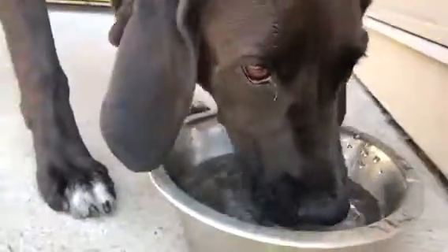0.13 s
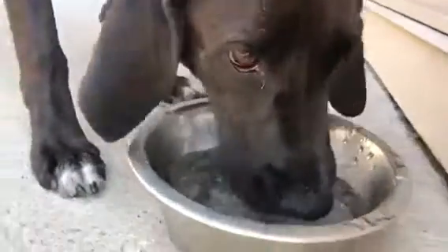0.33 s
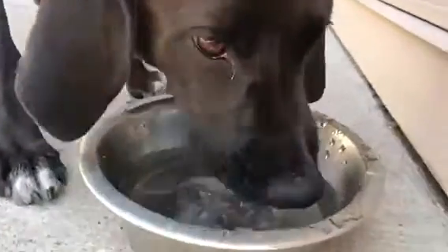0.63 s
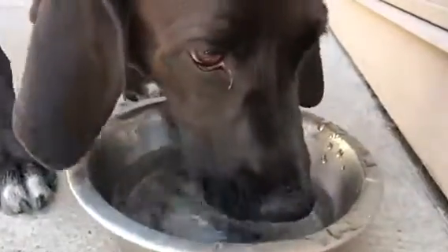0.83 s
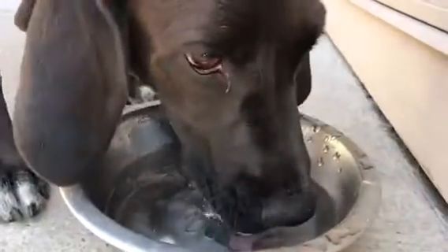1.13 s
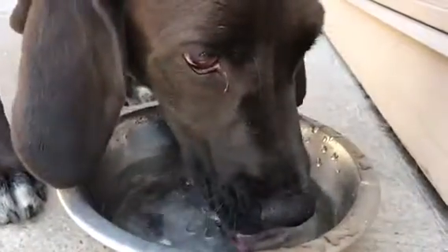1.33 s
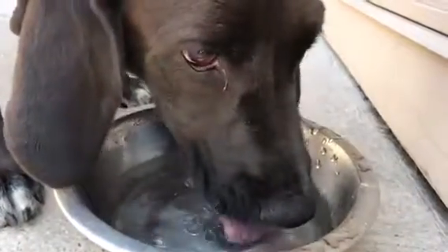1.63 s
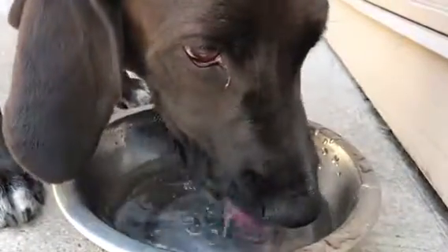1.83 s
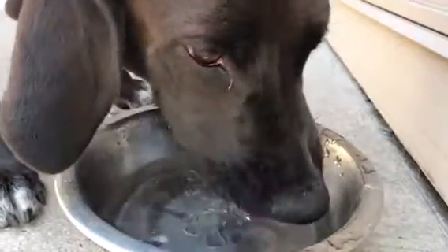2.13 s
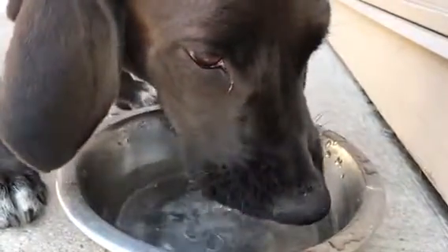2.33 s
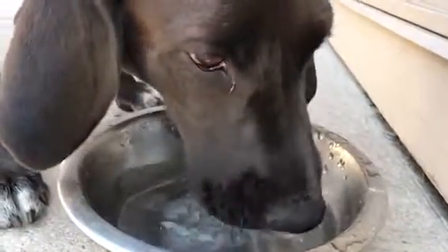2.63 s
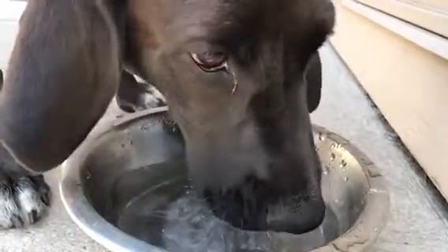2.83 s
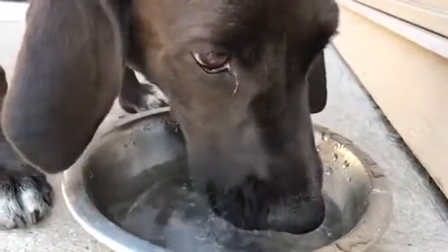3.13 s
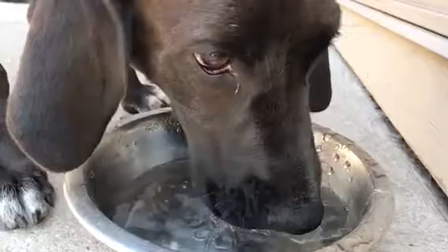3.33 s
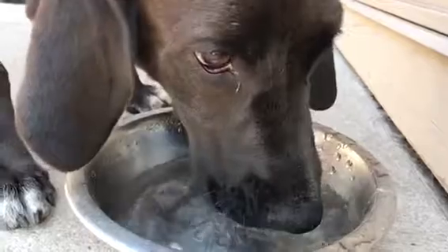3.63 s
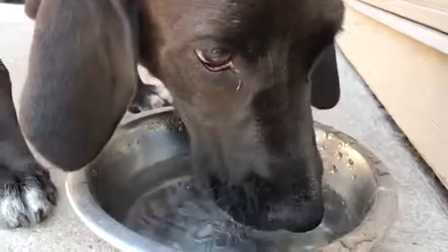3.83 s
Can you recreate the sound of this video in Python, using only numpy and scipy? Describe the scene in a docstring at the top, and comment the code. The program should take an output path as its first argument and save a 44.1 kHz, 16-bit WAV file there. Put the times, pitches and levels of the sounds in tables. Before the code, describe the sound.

Dog drinking from a steel bowl, crisp lapping first, then near silence and dull sloshing.

```python
"""Dog lapping from a steel bowl

A dog laps water close to the microphone, on a hard floor, over a faintly crackling hiss and a low rumble.
Tongue strokes are clouds of short chirps, trapped air bubbles are gliding sines, and the bowl rings along.
After the first second the hiss sinks, returning in swells, and the sound turns muffled: low gulps and sloshing."""
import sys
import numpy as np
from scipy import signal
from scipy.fft import rfft, irfft
from scipy.io import wavfile

SR = 44100
rng = np.random.default_rng(int(sys.argv[2]) if len(sys.argv) > 2 else 0)


def transcribe(signal):
    """Save signal, clipped to [-1, 1], as a 16-bit WAV file at the path in sys.argv[1]."""
    frames = np.atleast_2d(signal).T
    limited = np.clip(frames, -1, 1)
    pcm = np.round(limited * 32767).astype(np.int16)
    wavfile.write(sys.argv[1], SR, pcm)


N = 176400
T = np.arange(N) / SR
TOP_HZ = 16000


def undb(db):
    """Decibels to gain."""
    return 10 ** (np.asarray(db) / 20)


def curve(rows, t=T):
    """Straight lines through (s, value) rows."""
    return np.interp(t, *np.array(rows).T)


def add(out, start_s, sound):
    """Mix a sound in at its start time."""
    i = max(int(start_s * SR), 0)
    out[i:i + len(sound)] += sound[:N - i]


def noise(spectrum):
    """Noise of rms 1 with a (Hz, dB) colour, interpolated over log frequency."""
    hz, db = np.array(spectrum).T
    f = np.maximum(np.fft.rfftfreq(N, 1 / SR), 1)
    colour = undb(np.interp(np.log(f), np.log(hz), db))
    x = irfft(rfft(rng.standard_normal(N)) * colour, N)
    return x / x.std()


GRAIN_SCATTER_DB, GRAIN_RISE_CYCLES, CLOUD_FADE_DB = 7., 0.8, 1.5
GRAIN_GLIDE_PER_CYCLE = 0.011  # relative pitch


def cloud(length_s, centre_hz, octaves, cycles, count):
    """Short chirps scattered over a span, on average ever weaker, each gliding upward; energy as rms 1 over the span."""
    t = np.arange(int((length_s + 10 * cycles / centre_hz + .004) * SR)) / SR
    place = (np.arange(count) + rng.random(count))[:, None] / count
    pitch, size = rng.standard_normal((2, count, 1))
    # tanh bounds the scatter to two standard deviations
    hz = centre_hz * 2 ** (octaves * 2 * np.tanh(pitch / 2))
    hz = np.clip(hz, 40, TOP_HZ)
    turns = np.maximum(t - place * length_s, 0) * hz
    envelope = (1 - np.exp(-turns / GRAIN_RISE_CYCLES)) * np.exp(-turns / cycles)
    gain = undb(GRAIN_SCATTER_DB * 2 * np.tanh(size / 2) - CLOUD_FADE_DB * place) * np.sqrt(hz)
    glided_turns = turns * (1 + GRAIN_GLIDE_PER_CYCLE * np.minimum(turns, 10) / 2)
    x = (gain * envelope * np.sin(2 * np.pi * glided_turns)).sum(0)
    return x / np.sqrt(np.sum(x ** 2) / (length_s * SR))


# Hiss colour. Each row: frequency in Hz, relative density in dB per Hz.
HISS = [(60, -3), (180, 3), (420, -1), (650, -7.5), (1000, -9), (2200, -16), (3100, -12), (5000, -20),
        (9000, -25.5), (15000, -33.5)]
# Hiss level. Each row: time in seconds, rms level in dB.
HISS_LEVEL = [(0, -49), (.22, -48.5), (.48, -52), (.66, -58), (.75, -65.5), (.9, -60.5), (1.0, -78),
              (1.3, -78.5), (1.85, -80), (1.95, -53.5), (2.22, -67.5), (2.5, -57), (3.03, -61.5),
              (3.15, -73), (3.5, -79.5), (4, -82)]
# Rumble colour. Each row: frequency in Hz, relative density in dB per Hz.
RUMBLE = [(15, -7), (35, 2), (75, -1), (120, -14.5), (300, -46)]
# Rumble level. Each row: time in seconds, rms level in dB.
RUMBLE_LEVEL = [(.54, -61.5), (.75, -70), (1.8, -78.5), (2.08, -46.5), (2.36, -70.5), (2.66, -57.5),
                (2.88, -49.5), (3.2, -71.5), (3.4, -64), (3.7, -65.5), (3.87, -62.5), (4, -69.5)]


def background():
    """Soft hiss and low rumble: two coloured noises, each following its level curve."""
    hiss = noise(HISS) * undb(curve(HISS_LEVEL))
    rumble = noise(RUMBLE) * undb(curve(RUMBLE_LEVEL))
    return hiss + rumble


CRACKLE_HZ, CRACKLE_OCTAVES, CRACKLE_CYCLES, CRACKLE_OVER_HISS_DB, CRACKLE_S = 1110, 2.3, 5., -2.5, 0.015


def crackle():
    """Faint crackle in the hiss: scattered pairs of short chirps at random times, their level following the hiss."""
    out = np.zeros(N)
    for start_s in np.sort(rng.random(size=70)) * T[-1]:
        level_db = curve(HISS_LEVEL, start_s) + CRACKLE_OVER_HISS_DB
        pair = cloud(CRACKLE_S, CRACKLE_HZ, CRACKLE_OCTAVES, CRACKLE_CYCLES, count=2)
        add(out, start_s, undb(level_db) * pair)
    return out


# Modes of the steel bowl and the air in it.
# Each row: frequency in Hz, gain at resonance in dB relative to BOWL_DB, t60 in seconds.
BOWL = [(182.3, -16.5, .14), (255, -17.5, 0.28), (400.5, -19, 0.24), (494, -19, .22), (943, -24.5, .3),
        (1153, -19, 0.047), (1417, -19, 0.48), (3100, -23.5, 0.6), (3205, -18.5, .25)]
BOWL_DB = 11.5


def bowl_response(t):
    """Impulse response of the bowl: decaying sines, scaled to their gain at resonance."""
    ring = np.zeros(len(t))
    for hz, db, t60_s in BOWL:
        decay_per_s = np.log(1000) / t60_s
        ring += undb(db + BOWL_DB) * 2 * decay_per_s / SR * np.exp(-decay_per_s * t) * np.sin(2 * np.pi * hz * t)
    return ring


FLOOR_ECHO_ENERGY_DB, FLOOR_ECHO_T60_S = -11.51, 0.053


def echo_response(t):
    """Short, soft echo from floor and wall: decaying noise, rolled off above 6 kHz."""
    lowpass = signal.butter(1, 6000, fs=SR, output="sos")
    echo = signal.sosfilt(lowpass, rng.standard_normal(len(t)))
    echo = echo * np.exp(-np.log(1000) * t / FLOOR_ECHO_T60_S)
    return undb(FLOOR_ECHO_ENERGY_DB) * echo / np.sqrt(np.sum(echo ** 2))


def surroundings(near):
    """The near sounds excite the bowl and the echo, by convolution."""
    t = T[:SR // 2]
    return signal.fftconvolve(near, bowl_response(t) + echo_response(t))[:N]


# Water heaving in the bowl. Each row: start in seconds, length in seconds, centre in Hz, level in dB.
SLOSHES = [(0.085, 0.015, 283, -37.5), (0.315, .02, 250, -43), (0.416, 0.01, 208.4, -38),
           (0.507, 0.022, 303, -46.5), (0.695, 0.018, 369, -47.5), (0.846, 0.049, 341.5, -52.5),
           (1.369, .24, 187, -69), (1.91, 0.14, 224.2, -46.5), (2.042, 0.078, 217.6, -45),
           (2.132, 0.09, 216.3, -57.5), (2.262, 0.055, 357, -66), (2.39, 0.12, 400, -57.5),
           (2.53, 0.074, 212.4, -54.5), (2.609, 0.1, 174.7, -49.5), (2.758, 0.081, 300.5, -54.5),
           (2.836, .1, 255, -41.5), (2.948, .075, 318, -47.5), (3.036, 0.055, 225.3, -51),
           (3.111, 0.22, 271, -67.5), (3.416, .2, 224.6, -74.5), (3.806, .11, 161.3, -58.5)]
SLOSH_OCTAVES, SLOSH_CYCLES = .6, 2.1


def sloshes():
    """Large pockets of air collapse as the water heaves round the muzzle: low clouds of chirps."""
    out = np.zeros(N)
    for start_s, length_s, hz, db in SLOSHES:
        add(out, start_s, undb(db) * cloud(length_s, hz, SLOSH_OCTAVES, SLOSH_CYCLES, count=32))
    return out


# Trapped air bubbles. Each row: start in seconds, pitch in Hz, approximate peak in dB, life in seconds.
BUBBLES = [(0.059, 2970, -29.5, 0.0046), (.061, 700, -33, 0.012), (0.0662, 1480, -21, 0.0058),
           (0.088, 1186, -27.5, 0.011), (0.087, 350, -22.5, .008), (0.0964, 1686, -18, 0.0041),
           (.102, 1946, -34, 0.017), (0.13, 3420, -33.5, .003), (0.309, 1162, -29, 0.0072),
           (0.3205, 1670, -20, 0.0038), (.323, 1000, -24.5, 0.0024), (.324, 751, -29, .01),
           (0.332, 1780, -22.5, 0.0034), (0.353, 1393, -23, 0.002), (0.359, 2644, -38, 0.018),
           (.395, 3004, -28.5, .006), (0.4165, 3080, -25, .003), (.419, 241, -25, 0.0074),
           (.426, 3163, -26, .005), (.430, 3716, -28.5, 0.0033), (0.4752, 4600, -38.5, 0.0033),
           (0.512, 909, -41, 0.0092), (0.686, 3160, -41, 0.0024), (0.6988, 867, -27.5, 0.0041),
           (0.706, 3150, -29, 0.0027), (.708, 609, -28, 0.0044), (.780, 3150, -51, 0.0078),
           (0.791, 934, -35, 0.018), (.875, 475.5, -37.5, 0.0063), (0.9132, 1321, -46.5, 0.0076),
           (1.272, 395, -62.5, 0.029), (1.353, 234.8, -54, .035), (1.902, 350, -32.5, 0.011),
           (1.928, 1064, -54, 0.029), (2.055, 531, -33.5, 0.021), (2.065, 351.8, -30.5, .016),
           (2.104, 561, -43, 0.018), (2.265, 422, -47.5, 0.041), (2.360, 800, -36.5, 0.005),
           (2.379, 1158, -51.5, 0.016), (2.426, 1660, -42, 0.0046), (2.600, 1580, -47, 0.0039),
           (2.4734, 1917, -34, 0.007), (2.471, 1170, -37.5, 0.0064), (2.503, 387.2, -34, 0.031),
           (2.498, 485, -35.5, 0.015), (2.828, 336, -41, 0.035), (2.865, 400, -29, 0.011),
           (2.912, 478, -31.5, 0.015), (2.916, 257.3, -33, 0.019), (2.965, 1170, -44, 0.0079),
           (3.015, 170.7, -31, 0.016), (3.773, 380, -59.5, 0.024)]
BUBBLE_RISE_CYCLES, BUBBLE_FADE_POWER = 1.7, 1.7
BUBBLE_GLIDE_OCTAVES = 0.02  # upward, per life
BUBBLE_WOBBLE = 0.028  # relative pitch, standard deviation


def bubbles():
    """Each bubble swells within a cycle or two, then fades while its pitch glides up and wobbles."""
    out = np.zeros(N)
    for start_s, hz, db, life_s in BUBBLES:
        age = np.arange(int(4 * life_s * SR)) / (life_s * SR)  # in lives
        wobble = np.interp(age, np.linspace(0, age[-1], 16), rng.standard_normal(size=16))
        glide = 2 ** (BUBBLE_GLIDE_OCTAVES * np.minimum(age, 2))
        turns = np.cumsum(hz * glide * (1 + BUBBLE_WOBBLE * wobble)) / SR
        envelope = (1 - np.exp(-turns / BUBBLE_RISE_CYCLES)) * np.exp(-age ** BUBBLE_FADE_POWER)
        # 1.206 offsets the peak lost to the slow rise
        add(out, start_s, 1.206 * undb(db) * envelope * np.sin(2 * np.pi * turns))
    return out


# Splashes of tongue and lips.
# Each row: start in seconds, length in seconds, body centre in Hz, body level in dB, spray level in dB.
SPLASHES = [(.001, 0.012, 1770, -39, -47.5), (0.0504, 0.0044, 6500, -43.5, -47),
            (0.0599, 0.0026, 2820, -34, -29.5), (0.066, 0.016, 3920, -45.5, -55),
            (0.087, 0.0056, 2470, -34.5, -40.5), (.094, 0.016, 1603, -35, -49.5),
            (0.108, 0.017, 2640, -41, -42), (0.256, 0.0021, 4270, -38.5, -66),
            (0.305, .009, 2394, -36, -50), (0.318, .018, 1910, -34.5, -42.5),
            (0.3506, .014, 1860, -36.5, -46), (0.37, .012, 2798, -40.5, -50),
            (0.3917, 0.021, 2110, -38.5, -46), (0.4182, 0.0042, 2836, -30.5, -39),
            (0.419, 0.0046, 854, -36, -40.5), (0.425, .014, 3213, -38, -52),
            (0.52, 0.014, 1260, -47, -58.5), (0.638, 0.028, 3700, -60, -66.5),
            (0.684, 0.013, 4000, -48, -52.5), (0.7018, 0.0053, 2217, -34.5, -42),
            (0.788, 0.0054, 2000, -45.5, -50), (0.799, 0.023, 1700, -50.5, -61.5),
            (0.856, 0.0055, 1570, -45, -58.5), (0.866, 0.0077, 1940, -45, -54.5),
            (0.884, 0.048, 1202, -58.5, -100), (1.488, 0.016, 1707, -73, -97.5),
            (1.921, 0.022, 1059, -58, -40), (1.971, 0.085, 844, -59.5, -66),
            (2.042, .016, 837, -49.5, -70.5), (2.06, 0.067, 1095, -59.5, -62),
            (2.265, 0.018, 866, -53.5, -55), (2.36, .025, 800, -54, -69.5),
            (2.392, 0.073, 1016, -57.5, -51.5), (2.472, 0.0054, 1490, -43, -41.5),
            (2.483, 0.016, 1400, -52, -57), (2.53, 0.028, 1022, -56.5, -71),
            (2.596, 0.0063, 1630, -68.5, -45.5), (2.775, 0.043, 748, -57, -72),
            (2.841, 0.1, 1105, -57, -57), (2.96, 0.0072, 1490, -49, -62),
            (2.988, 0.058, 1000, -68.5, -62.5), (3.265, 0.017, 848, -67, -67)]
SPLASH_OCTAVES, SPLASH_CYCLES = .7, 3.2
SPRAY_HZ, SPRAY_OCTAVES, SPRAY_CYCLES = 8090, .55, 9.6


def splashes():
    """The tongue slaps and tears the water: a wet burst of tiny cavities with fine spray on top."""
    out = np.zeros(N)
    for start_s, length_s, hz, body_db, spray_db in SPLASHES:
        body = cloud(length_s, hz, SPLASH_OCTAVES, SPLASH_CYCLES, count=40)
        spray = cloud(length_s, SPRAY_HZ, SPRAY_OCTAVES, SPRAY_CYCLES, count=56)
        add(out, start_s, undb(body_db) * body)
        add(out, start_s, undb(spray_db) * spray)
    return out


def scene():
    """Water, crackle, bowl, echo and background at one microphone."""
    near = splashes() + sloshes() + bubbles() + crackle()
    return (near + surroundings(near) + background())[None]


# Upper edge of the treble as the sound turns muffled. Each row: time in seconds, edge in Hz.
TREBLE_EDGE = [(.71, 15800), (.76, 12000), (.88, 9000), (1.0, 7150), (1.17, 4400), (1.2, 2262)]


def record(dry):
    """A steep, moving lowpass closes the treble down; a fixed one cuts the very top."""
    f, t, z = signal.stft(dry, SR, nperseg=1024)
    passed = 1 / np.sqrt(1 + (f[:, None] / curve(TREBLE_EDGE, t)) ** 70)
    muffled = signal.istft(z * passed, SR)[1][:, :N]
    top_cut = signal.ellip(8, .2, 70, TOP_HZ, fs=SR, output="sos")
    return signal.sosfilt(top_cut, muffled)


dry = scene()
out = record(dry)
transcribe(out)
```